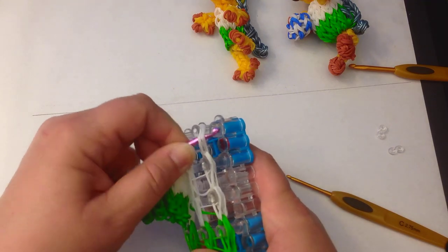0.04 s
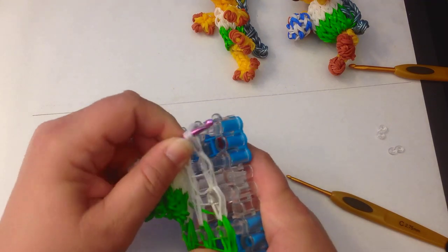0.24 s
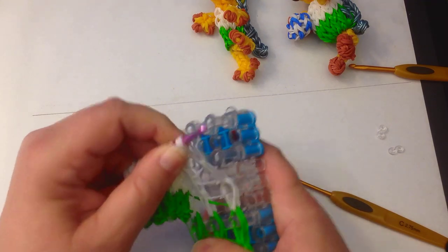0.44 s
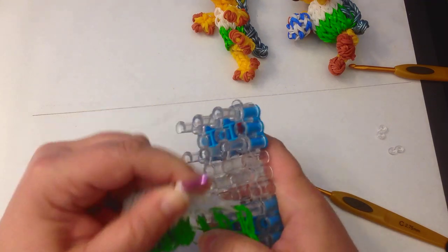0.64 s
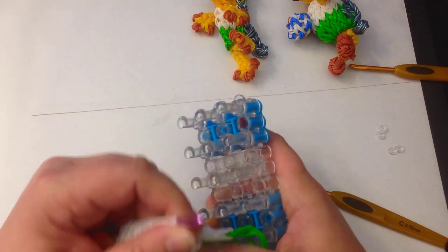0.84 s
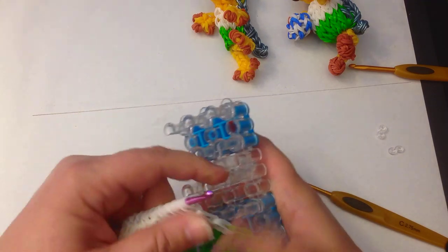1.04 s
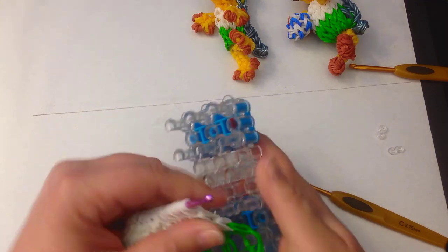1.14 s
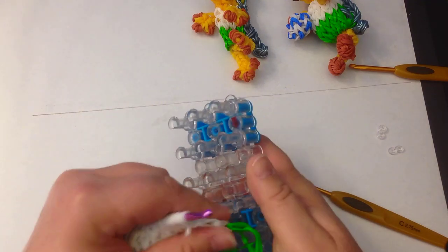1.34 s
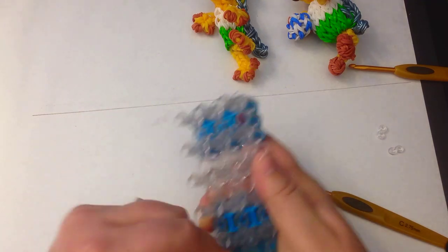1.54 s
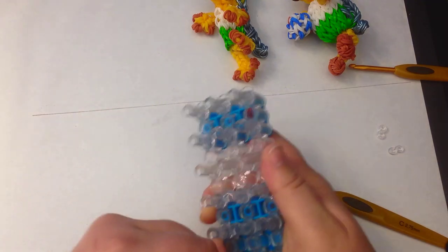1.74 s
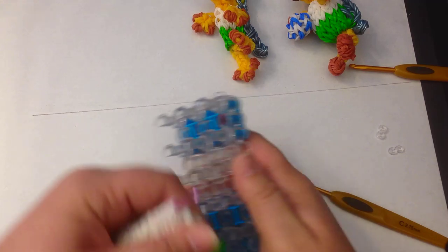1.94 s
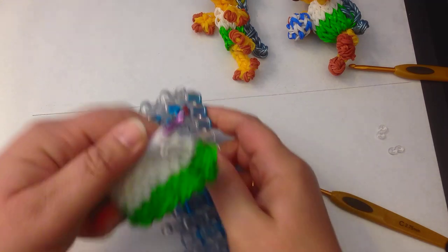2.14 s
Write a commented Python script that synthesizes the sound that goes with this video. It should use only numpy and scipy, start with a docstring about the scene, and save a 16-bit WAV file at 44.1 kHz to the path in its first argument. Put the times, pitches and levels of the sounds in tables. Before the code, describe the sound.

Close to the microphone, a hook and rubber bands click against a plastic loom's pegs, busily at first, then more sparsely. Freed bands twang softly and the loom bumps the table, over the faint hiss of a quiet room.

```python
"""Rubber bands being worked off a small plastic loom with a hook, close to the microphone, on a table
in a quiet room. Each slip chatters briefly on a peg, rings that peg and rattles the loom; the harder
ones and the hands also thump the table. Freed bands twang low and rub faintly between the clicks.
A short room tail, a soft hiss and a faint hum lie underneath."""
import sys
import numpy as np
from scipy import signal
from scipy.fft import rfft, irfft, next_fast_len
from scipy.io import wavfile

SR = 44100
rng = np.random.default_rng(int(sys.argv[2]) if len(sys.argv) > 2 else 0)


def generate_wav(sig):
    """Save sig (samples, or channels by samples) to the path in sys.argv[1] as 16-bit PCM at SR."""
    pcm = np.round(np.clip(np.atleast_2d(sig).T, -1, 1) * 32767).astype(np.int16)
    wavfile.write(sys.argv[1], SR, pcm)


N = 96623


def undb(db):
    """Decibels to amplitude."""
    return 10 ** (np.asarray(db) / 20)


def unit(x):
    """Scale to an energy of 1."""
    return x / np.sqrt(np.sum(x ** 2) + 1e-20)


def unit_rms(x):
    """Scale to an RMS of 1."""
    return unit(x) * np.sqrt(len(x))


def fade(t, t60):
    """A decay of 60 dB in t60 seconds."""
    return np.exp(-np.log(1000) * t / t60)


def add(out, at, x):
    """Mix x into out from a time in seconds."""
    i = int(at * SR)
    out[i:i + len(x)] += x[:len(out) - i]


def colour(x, points):
    """Shape a sound by (Hz, dB) points."""
    hz, db = np.array(points).T
    size = next_fast_len(2 * len(x))
    f = np.maximum(np.fft.rfftfreq(size, 1 / SR), 1)
    gain = undb(np.interp(np.log(f), np.log(hz), db))
    return irfft(rfft(x, size) * gain, size)[:len(x)]


def ring(t, hz, db, t60):
    """One mode of a struck body: a decaying sine."""
    return undb(db) * np.sin(2 * np.pi * hz * t) * fade(t, t60)


def push(t, ms):
    """A half-sine force lasting some milliseconds."""
    return np.sin(np.pi * np.minimum(t * 1000 / ms, 1))


def drive(force, response):
    """Pass a force through an impulse response, keeping its length."""
    return signal.fftconvolve(force, response)[:len(force)]


def room_tone():
    """Steady hiss and rumble of the quiet room, with a faint, wavering hum."""
    # Each row: frequency in Hz, relative noise density in dB.
    hiss_colour = [(25, -1), (60, 9.5), (125, 5), (175, 4), (240, -6), (430, -4), (1000, -13),
                   (2200, -13.5), (3300, -14), (5000, -13.5), (9000, -15.5), (15500, -18)]
    hiss_db, hum_db, hum_hz, waver_hz = -59.5, -70, 344.5, 7
    hiss = unit_rms(colour(rng.standard_normal(N), hiss_colour))
    slow = signal.butter(2, waver_hz, fs=SR, output="sos")
    waver = unit_rms(signal.sosfilt(slow, rng.standard_normal(N) + 1j * rng.standard_normal(N)))
    tone = np.exp(2j * np.pi * hum_hz * np.arange(N) / SR)
    hum = unit_rms(np.real((1 + waver) * tone))
    return undb(hiss_db) * hiss + undb(hum_db) * hum


def room(direct):
    """The close sound, quick reflections off table and hands, and a faint tail from the walls."""
    # Each row: frequency in Hz, gain of the reflections in dB.
    room_colour = [(60, -19), (300, -8), (700, 3), (1100, 2), (2000, -0.5), (4000, -4), (6000, -5),
                   (9000, -6), (15000, -4.5)]
    early_db, late_db, delay_s = -10, -19, 0.0036
    t = np.arange(SR // 2) / SR
    early = unit(rng.standard_normal(len(t)) * fade(t, t60=0.1))
    late = unit(rng.standard_normal(len(t)) * fade(t, t60=0.42))
    tail = colour(undb(early_db) * early + undb(late_db) * late, room_colour)
    out = direct.copy()
    add(out, delay_s, drive(direct, tail))
    return out


def table_thumps():
    """The loom presses on the table: longer pushes thud duller; the spot favours low or high modes."""
    # Each row: start in seconds, push in ms, relative level in dB, tilt of the modes in dB per octave.
    pushes = [(0.367, 2.4, -32, 10), (0.5763, 2.3, -26, -1.5), (0.729, 5.25, -27.5, 10.5),
              (0.8438, 1.5, -44.5, -4), (1.172, 4.5, -42.5, -2), (1.525, .8, -43.5, -7),
              (1.77, 5, -41, -0.5), (1.812, 7.6, -40, -5), (1.9550, 3.9, -17, 1),
              (1.9570, 1.15, -28.5, 4.5), (2.004, 7.2, -26, -2), (2.033, 0.66, -48, 2)]
    # The table top's modes. Each row: frequency in Hz, relative level in dB, T60 in seconds.
    table_modes = [(82, -2, 0.11), (117, 3.5, 0.065), (169.6, -0.5, 0.073), (210, -12, 0.096),
                   (356, -6, 0.074), (485, -8.5, 0.028)]
    pivot_hz = 150
    out, t = np.zeros(N), np.arange(SR // 4) / SR
    for at, ms, db, tilt in pushes:
        top = sum(ring(t, hz, mode_db + tilt * np.log2(hz / pivot_hz), t60)
                  for hz, mode_db, t60 in table_modes)
        force = push(t, ms)
        add(out, at, undb(db) * drive(force / force.sum(), top) / 2)
    return out


def band_rubs():
    """Rubber and skin creep over the plastic in tiny uneven slips; tight bands rasp more brightly."""
    # Each row: start in seconds, length in seconds, level in dB, treble gain in dB.
    strokes = [(0.286, 0.1104, -43, 9), (0.481, 0.32, -56.5, -7), (0.635, 0.49, -63, 11),
               (1.471, 0.04, -47, 8), (1.891, 0.3, -58.5, 14)]
    # Each row: frequency in Hz, relative level of the rasp in dB.
    rasp_colour = [(200, 16), (600, 1), (1100, 2), (2300, 5), (5500, 1), (9000, -11.5), (15000, -25)]
    slips_per_s, spread_db, treble_hz = 3500, 3, 8000
    t = np.arange(N) / SR
    slipping = rng.random(N) < slips_per_s / SR
    slips = slipping * rng.standard_normal(N) * undb(spread_db * rng.standard_normal(N))
    rasp = unit_rms(colour(slips, rasp_colour))
    treble = signal.sosfiltfilt(signal.butter(2, treble_hz, "high", fs=SR, output="sos"), rasp)
    out = np.zeros(N)
    for at, length, db, treble_db in strokes:
        progress = np.clip((t - at) / length, 0, 1)
        swell = np.sqrt(np.abs(np.sin(np.pi * progress)))
        out += undb(db) * swell * (rasp + (undb(treble_db) - 1) * treble)
    return out


def band_twangs():
    """A stretched band snaps free and hums for a few cycles, its pitch sinking as it slackens."""
    # Each row: start in seconds, opening pitch in Hz, level in dB.
    twangs = [(0.297, 173, -33), (0.316, 130, -33.5), (0.338, 131.5, -36), (0.356, 126.4, -31.5),
              (0.595, 192, -45), (0.743, 173, -40), (0.994, 132, -44.5)]
    attack_s, sag_octaves_per_s = 0.0034, 5.3
    out, t = np.zeros(N), np.arange(SR // 6) / SR
    envelope = (1 - np.exp(-t / attack_s)) * fade(t, t60=0.11)
    for at, hz, db in twangs:
        phase = 2 * np.pi * np.cumsum(hz * 2 ** (-sag_octaves_per_s * t)) / SR
        add(out, at, undb(db) * np.sin(phase) * envelope)
    return out


def loom_knocks():
    """A firm slip rocks the whole loom, whose hollow underside rings at a pitch set by the grip."""
    # Each row: start in seconds, pitch in Hz, level in dB.
    knocks = [(0.5495, 606, -43), (0.654, 598, -37), (0.723, 594, -36.5), (0.843, 465, -41.5)]
    out, t = np.zeros(N), np.arange(SR // 8) / SR
    for at, hz, db in knocks:
        add(out, at, ring(t, hz, db, t60=0.051))
    return out


def loom_rattle(t, force):
    """A slip chatters and lets go: the frame rings, and its dense, short-lived modes crack."""
    # The plastic frame's modes. Each row: frequency in Hz, relative level in dB, T60 in seconds.
    frame_modes = [(591.6, -4, 0.038), (872, -12.5, 0.055), (1090, -12.5, 0.023), (1274, -15.5, 0.035),
                   (1648, 2, 0.035), (2029, 7.5, 0.025), (2269, 9.5, 0.016), (2470, 7.5, 0.025),
                   (3760, 6.5, 0.015), (4145, 5, 0.035), (5010, 14.5, 0.009), (5400, 14, 0.016),
                   (5770, 7, 0.025), (6570, 8, 0.016)]
    # Each row: frequency in Hz, relative level of the crack in dB.
    crack_colour = [(300, -3.5), (800, -14), (1400, -2), (2300, -8.5), (3100, -3), (4200, 9.5), (6500, -1),
                    (8500, -5.5), (11000, -11), (14500, -7.5)]
    chatter_db, snap_db, crack_db = -10, -9, -2
    detune, spread_db = 0.05, 3  # the modes scatter from slip to slip
    chatter, grain, level_draws, pitch_draws = rng.standard_normal((4, len(t)))
    release = signal.unit_impulse(len(t), np.argmax(force))
    modes = np.zeros(len(t))
    for k, (hz, db, t60) in enumerate(frame_modes):
        mode = ring(t, hz * (1 + detune * pitch_draws[k]), db + spread_db * level_draws[k], t60)
        modes += (-1) ** k * mode
    frame = drive(release + undb(chatter_db) * chatter * force, modes)
    crack = unit(grain * drive(force, fade(t, t60=0.018))) + undb(snap_db) * release
    return unit(frame) + undb(crack_db) * unit(colour(crack, crack_colour))


def peg_clicks():
    """Hook and band slip on a peg; the touched part rings over the loom's rattle, each slip in its own colour."""
    # Each row: start in seconds, contact in ms, ring pitch in Hz, ring level in dB (mostly the touched peg; #
    # the low 396 Hz ring is the loom's hollow underside), # then the rattle's level in dB in its hollow, body,
    # bright and top ranges.
    slips = [ (0.2917, 0.66, 4440, -37.5, -46.5, -45, -32.5, -30.5),
             (0.2967, 2.46, 5920, -38, -49, -38, -30.5, -32),
             (0.3174, 1.7, 6400, -37, -75, -56, -40.5, -36.5),
             (0.3306, 1.93, 5730, -41, -52, -42, -36, -34.5), (0.347, 2.16, 6500, -42, -44, -51, -38, -38),
             (0.3571, 0.49, 6040, -54, -44.5, -47, -36, -34.5),
             (0.3641, 1.8, 4080, -35.5, -42.5, -63, -34, -39),
             (0.3686, 2.1, 5910, -33, -45, -38.5, -31.5, -36), (0.524, 1, 5840, -52, -57, -51, -45, -47.5),
             (0.5492, 0.68, 5800, -64, -67, -57, -63, -56),
             (0.5633, 0.73, 5930, -44, -46.5, -41.5, -40, -41),
             (0.5703, 1.71, 6090, -25, -39.5, -35.5, -29, -33),
             (0.653, 1.74, 3860, -37, -45.5, -31, -25.5, -39), (0.7109, 1.1, 4670, -58, -62, -50, -49, -57),
             (0.7198, 2.0, 2370, -35.5, -51, -32.5, -27, -31.5),
             (0.7227, 1.6, 1342, -38, -38.5, -35, -27.5, -31),
             (0.7911, 1.2, 2060, -39.5, -52.5, -41.5, -36.5, -39),
             (0.842, 1.8, 1740, -42.5, -43.5, -36, -32.5, -35),
             (0.9094, 2.0, 5900, -50.5, -56, -54, -42.5, -60),
             (1.1074, 2.4, 1740, -52, -85, -53.5, -55.5, -63),
             (1.1686, 3.0, 1320, -54.5, -67, -44.5, -45, -68),
             (1.274, 1.61, 1080, -60, -59.5, -58.5, -79, -75),
             (1.3377, 1.37, 5780, -51.5, -89, -62.5, -51, -70),
             (1.3808, 0.62, 5750, -60, -75, -74, -60.5, -65), (1.4700, 1.06, 4760, -48, -58, -51, -63, -51),
             (1.4825, 1.6, 5060, -29.5, -61, -42.5, -29.5, -37),
             (1.49, 2.54, 4140, -60, -58, -44.5, -40, -44),
             (1.4950, 2.9, 3880, -39, -50.5, -44.5, -31.5, -49),
             (1.5184, 1.52, 396, -40.5, -46, -36.5, -29, -39.5),
             (1.7220, 1.18, 4000, -54.5, -81, -60, -65, -74),
             (1.73, 3.5, 4200, -50.5, -60, -53, -49.5, -61.5),
             (1.7642, 3, 3900, -35, -56.5, -42, -37, -53.5),
             (1.8066, 1.74, 4430, -44, -66, -46, -44.5, -57), (1.9052, 1.3, 5950, -59, -81, -63, -64, -63),
             (1.9490, 1.5, 5440, -50, -47, -95, -45.5, -50.5),
             (2.0226, 1.6, 5590, -37.5, -56.5, -66, -38, -50),
             (2.0293, 3.9, 4260, -52, -50.5, -51.5, -67, -50),
             (2.1061, 1.4, 4010, -40.5, -81, -56, -45.5, -71)]
    # The edges of those four ranges in Hz.
    edges_hz = [300, 950, 2900, 7300, 16000]
    click_s = 0.0072  # the levels are RMS, as if the energy fell within this time
    out, t = np.zeros(N), np.arange(SR // 16) / SR
    ranges = [signal.butter(3, pair, "band", fs=SR, output="sos")
              for pair in zip(edges_hz, edges_hz[1:])]
    for at, ms, ring_hz, ring_db, *range_dbs in slips:
        force = push(t, ms)
        rattle = loom_rattle(t, force)
        loom = sum(undb(db) * unit(signal.sosfilt(sos, rattle)) for sos, db in zip(ranges, range_dbs))
        peg = drive(force, fade(t, t60=0.007)) * np.sin(2 * np.pi * ring_hz * t)
        add(out, at, (loom + undb(ring_db) * unit(peg)) * np.sqrt(click_s * SR))
    return out


def scene():
    """One close microphone: clicks, knocks and rubs with the room on them, dry twangs and thumps."""
    handling = peg_clicks() + loom_knocks() + band_rubs()
    return (room(handling) + band_twangs() + table_thumps() + room_tone())[None]


def record(dry):
    """The recorder thins the deep bass and cuts the top."""
    low_cut_hz, top_hz = 56.6, 15200
    thin = signal.sosfilt(signal.butter(2, low_cut_hz, "high", fs=SR, output="sos"), dry)
    return signal.sosfilt(signal.ellip(8, .2, 70, top_hz, fs=SR, output="sos"), thin)


dry = scene()
out = record(dry)
generate_wav(out)
```